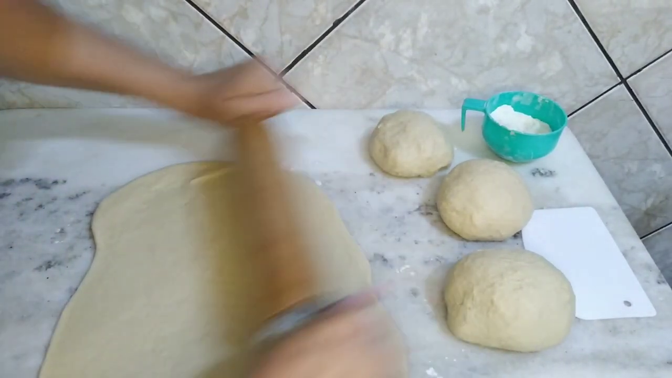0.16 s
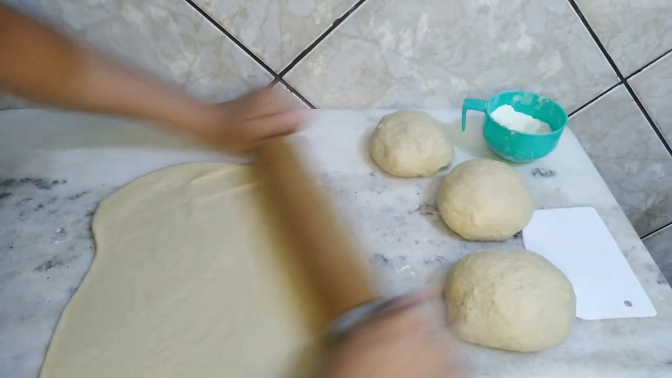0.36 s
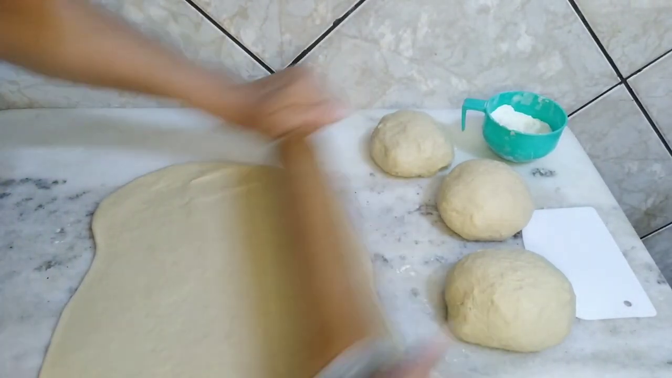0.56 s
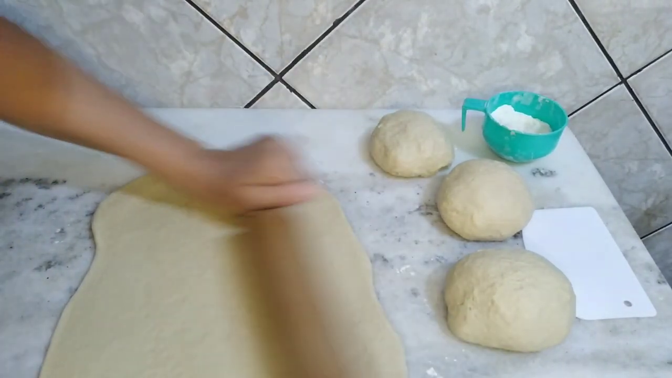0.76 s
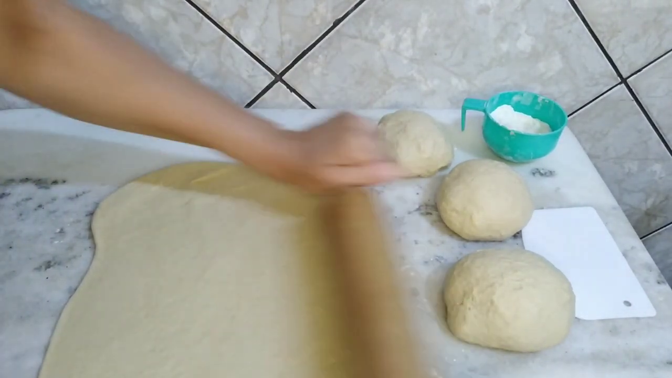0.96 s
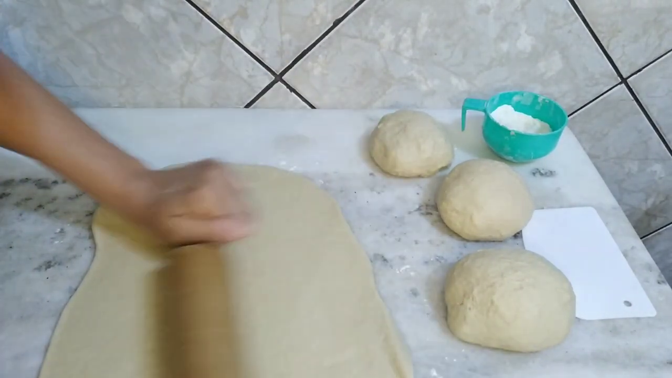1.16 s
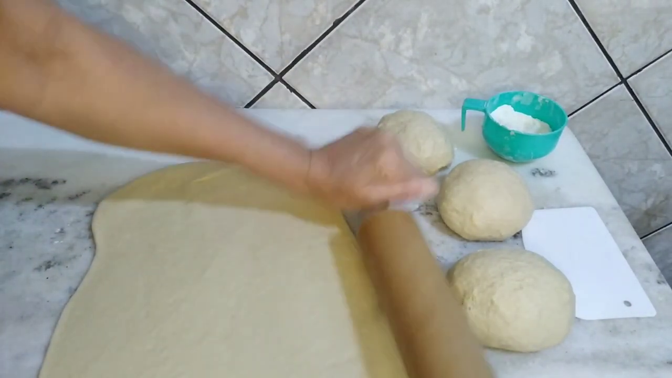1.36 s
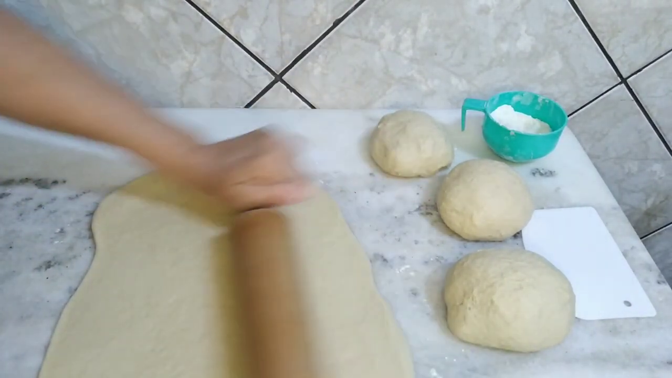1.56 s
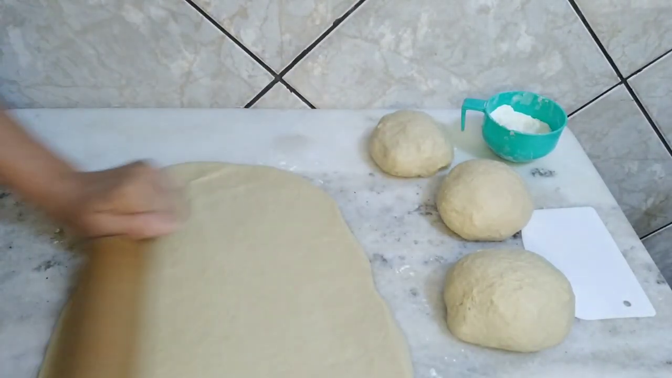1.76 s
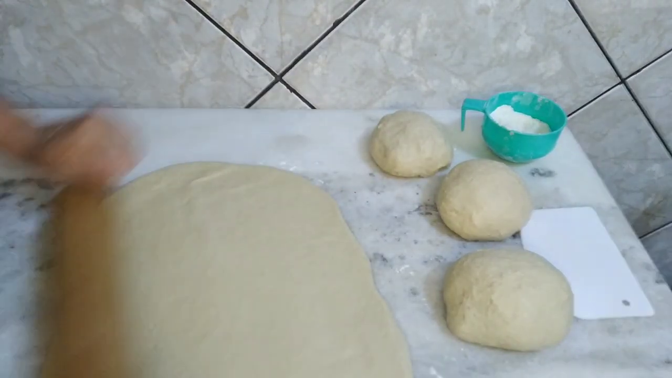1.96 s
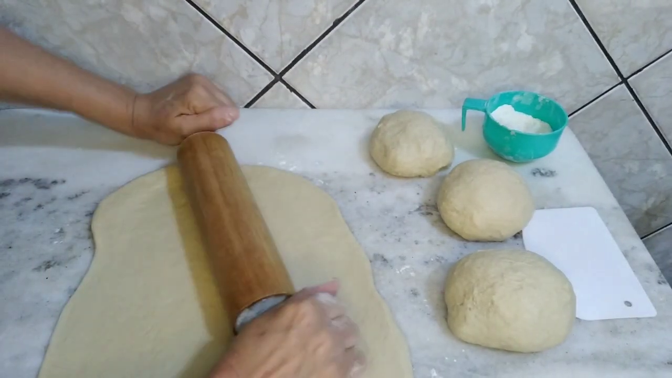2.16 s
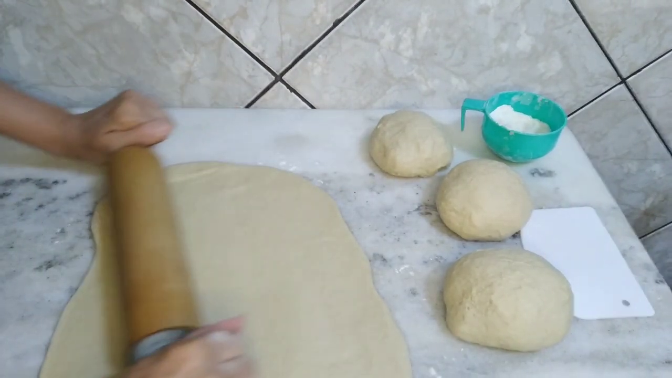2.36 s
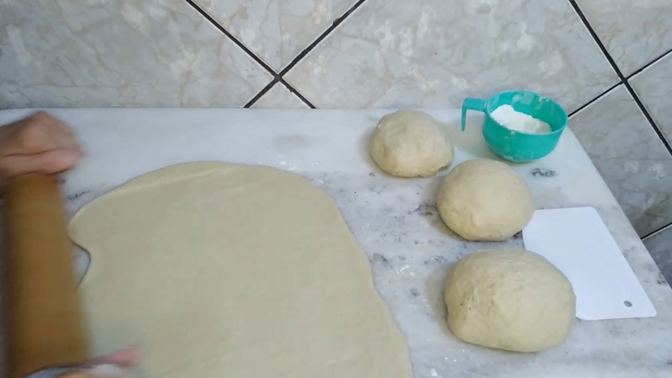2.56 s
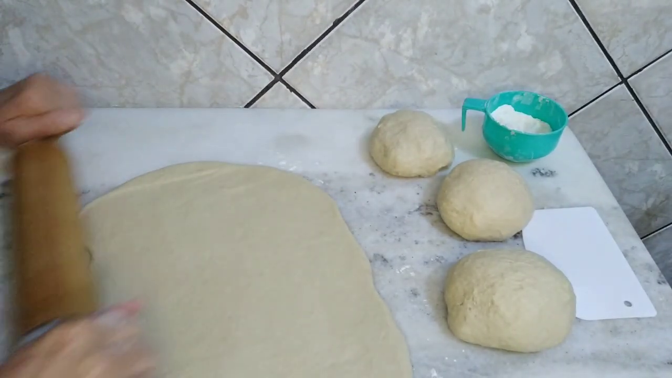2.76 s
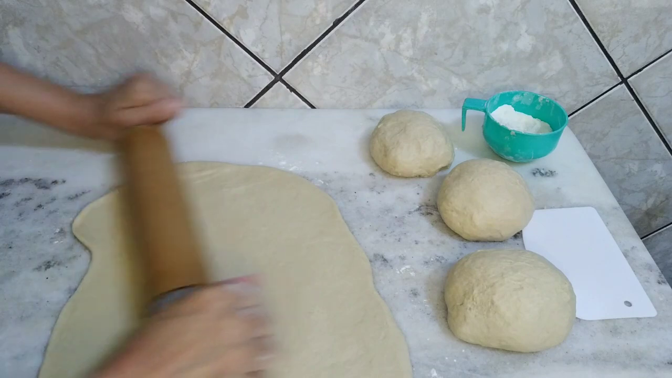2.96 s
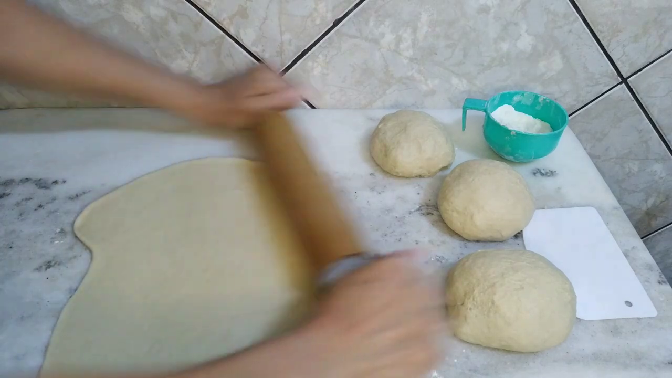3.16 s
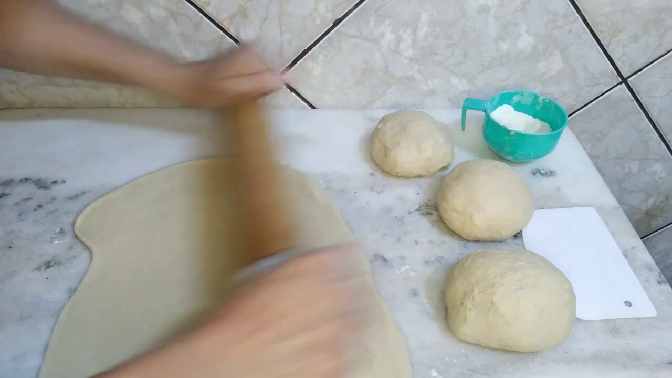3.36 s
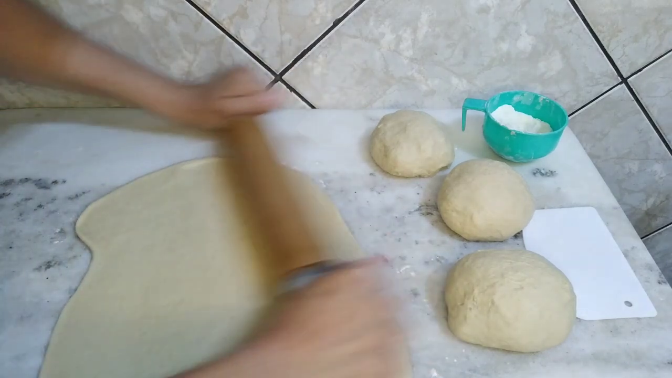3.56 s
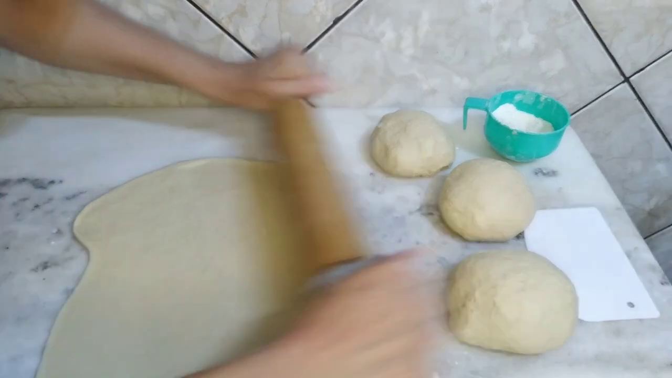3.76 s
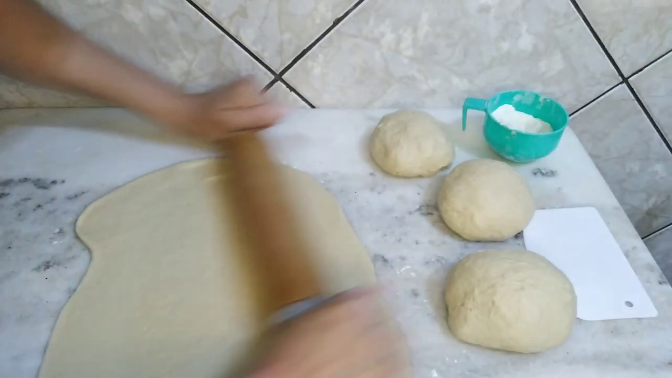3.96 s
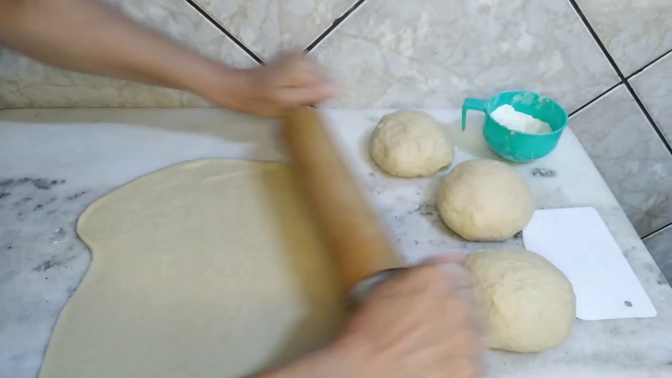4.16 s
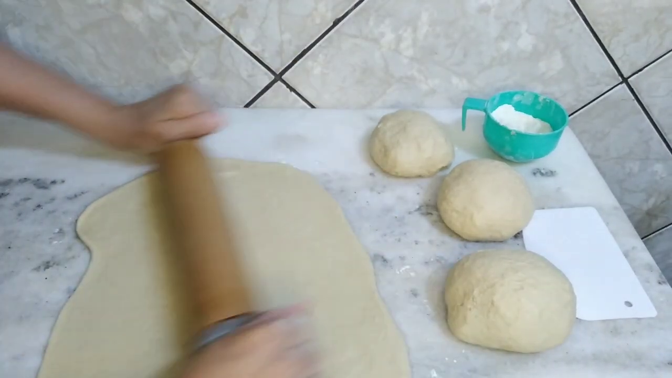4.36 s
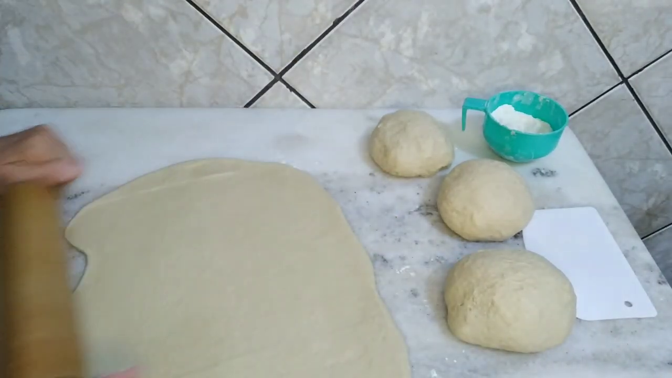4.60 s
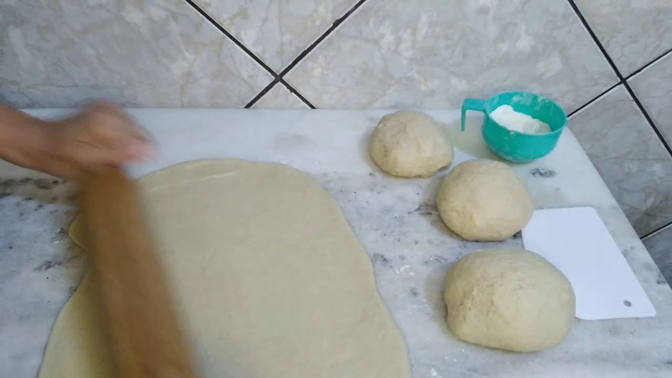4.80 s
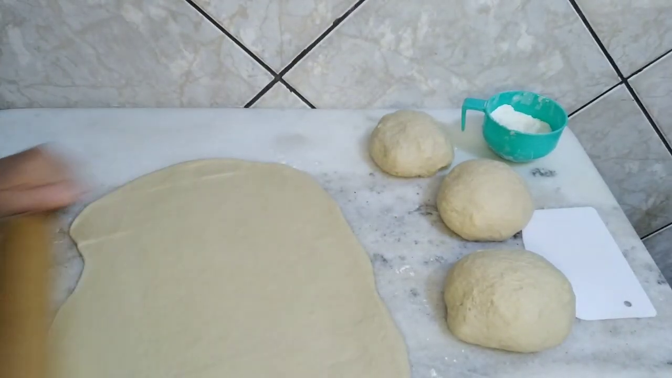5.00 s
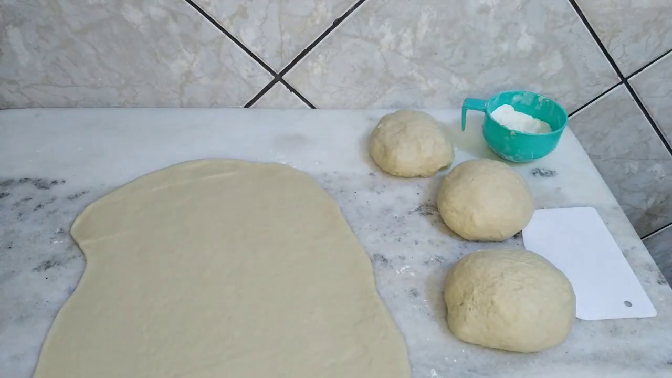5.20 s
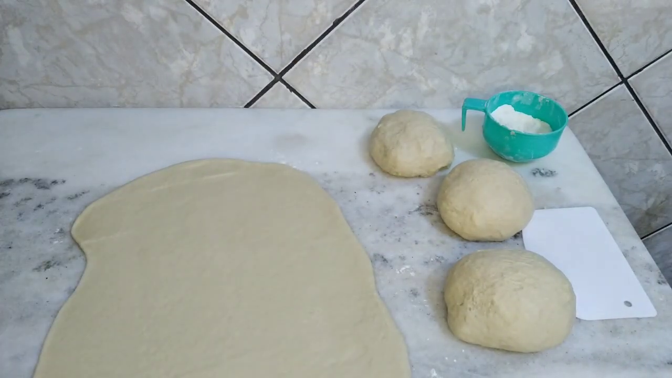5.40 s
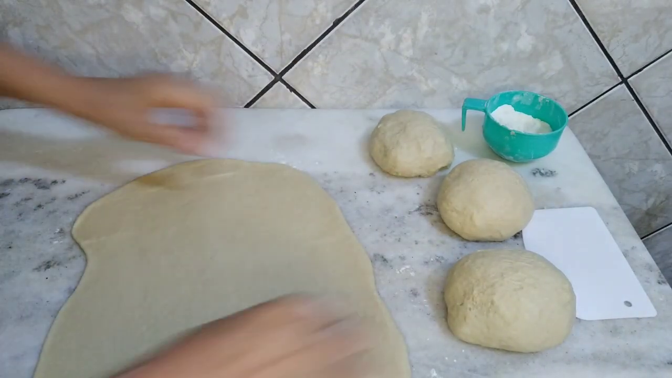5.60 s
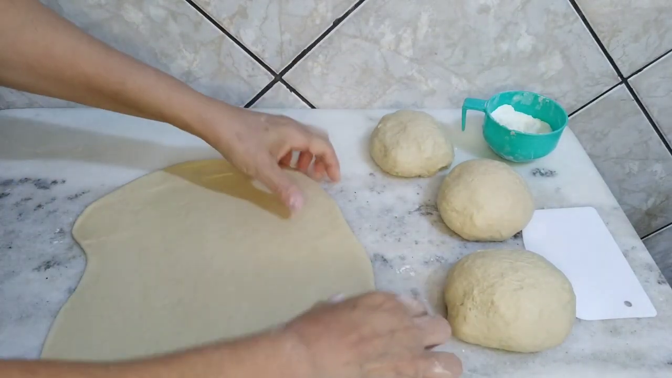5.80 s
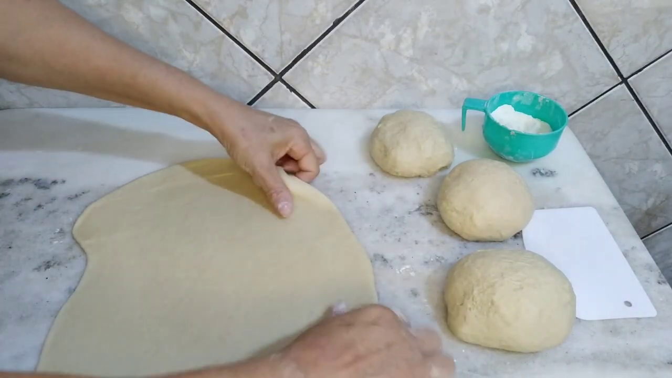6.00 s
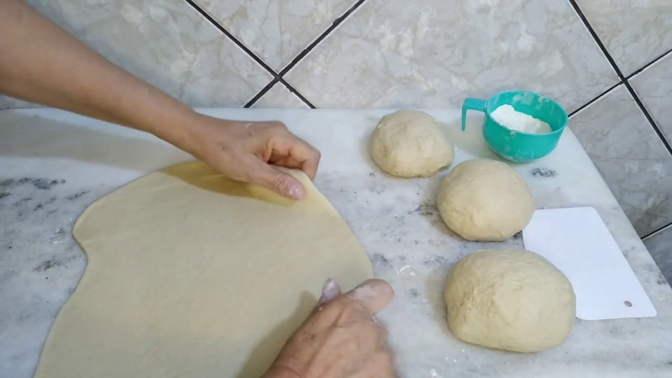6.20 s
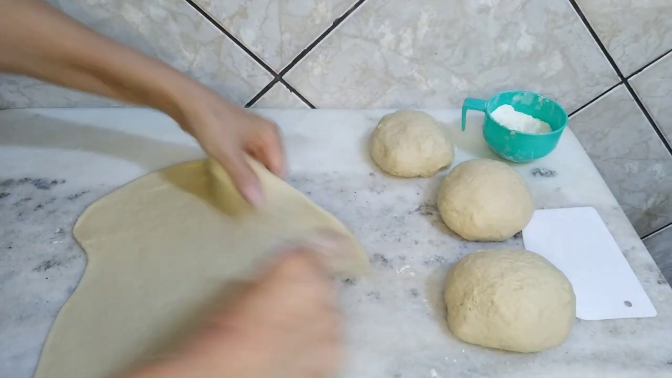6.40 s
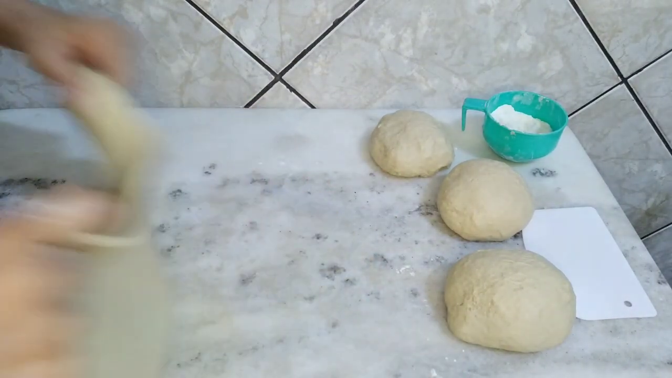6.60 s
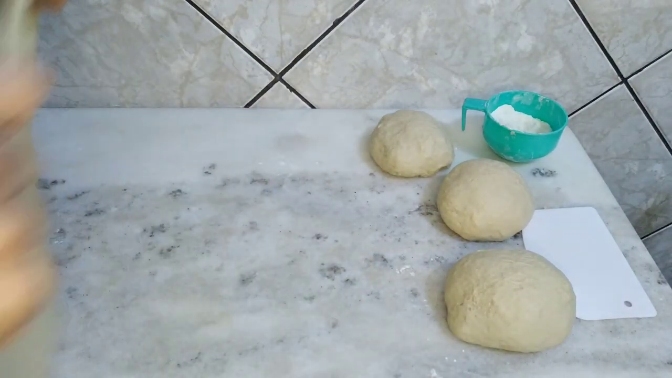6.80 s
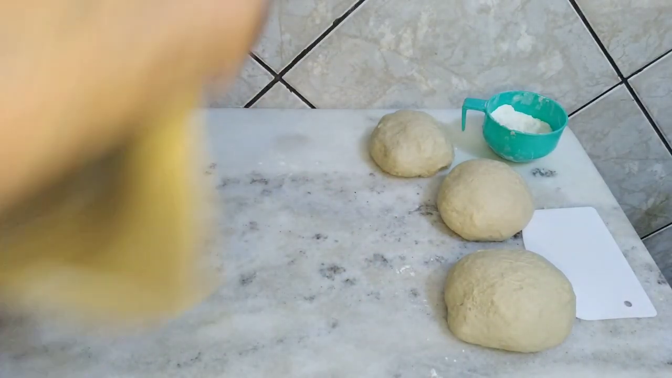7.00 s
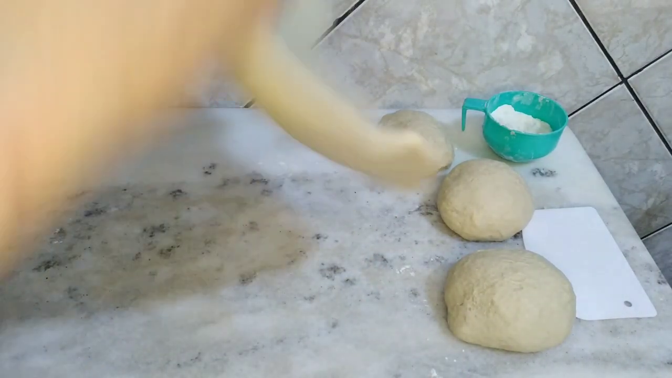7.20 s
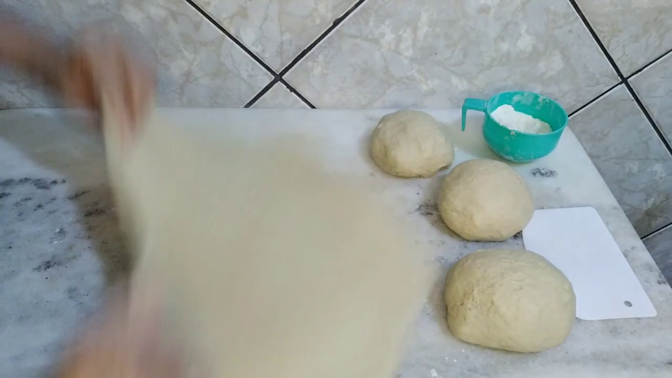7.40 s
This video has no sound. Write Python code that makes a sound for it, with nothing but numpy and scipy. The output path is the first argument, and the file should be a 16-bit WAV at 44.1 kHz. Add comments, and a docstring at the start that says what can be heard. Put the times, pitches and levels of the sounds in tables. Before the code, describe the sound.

A wooden rolling pin works dough on a stone counter in a small tiled kitchen, heard close in stereo. Each stroke brings low rumble, floury rubbing, soft deep thuds and hollow knocks, with faint squeaks. The pin is put aside with a brief clatter around five seconds; hands rustle lightly, the sheet peels away, and a loud wet-sounding slap ends it over a faint motor hum.

```python
"""Rolling pin on a stone counter

A wooden pin goes to and fro over dough in a tiled kitchen; then the sheet is peeled off and slapped down.
Landings ring the slab as damped modes, knocks ring the loose pin and its axle, and floury grit rubs and
hisses as filtered trains of tiny contacts. The pin clatters when put aside, faint squeaks are resonant noise,
a motor hums in wavering sines. Tiled walls add decaying noise echoes; two microphone ports hear it all,
and the level dips briefly at listed moments."""
import sys
import numpy as np
from scipy import signal
from scipy.fft import rfft, irfft, next_fast_len
from scipy.io import wavfile
from scipy.ndimage import uniform_filter1d

SR = 44100
rng = np.random.default_rng(int(sys.argv[2]) if len(sys.argv) > 2 else 0)


def store_pcm(level_fs):
    """Save levels as 16-bit WAV."""
    pcm = np.round(np.clip(level_fs, -1, 1) * 32767).astype(np.int16)
    wavfile.write(sys.argv[1], SR, np.atleast_2d(pcm).T)


def level_to_linear(level):
    """Convert decibel levels to linear amplitude factors, elementwise."""
    exponent = np.asarray(level, float) / 20
    return 10 ** exponent


N = 328545

# Landings of the pin on the dough. Each row: start in seconds, strength in dB, overtone level in dB
# relative to it, t60 of the lowest mode in seconds.
LANDINGS = [(0.232, -9, -14, 0.048), (0.253, -9.5, -26, 0.11), (0.674, 3.5, -11.5, 0.11),
            (0.756, -13, -35, 0.16), (0.823, -31, -5, 0.25), (1.109, -13, -14, 0.27),
            (1.2, -23.5, -31, 0.69), (1.549, -7.5, -14, 0.057), (1.745, -23, -50, 0.18),
            (2.128, -6, -9.5, 0.16), (2.532, -27, 0, 0.2), (2.892, -22.5, -14, 0.44),
            (2.93, -23.5, -29, 0.8), (3.44, -11.5, -32, 0.4), (3.485, -18.5, -22, 0.11),
            (3.874, -3, -29, 0.12), (4.272, 0.5, -11, 0.075), (4.577, -17.5, -24, 0.09),
            (4.839, 2.5, -17.5, 0.071), (4.95, -22.5, -29, 0.23), (5.805, -25.5, -22, 0.3)]
# Hard knocks of the wood. Each row: start in seconds, strength in dB, centre of the excited modes in Hz,
# their spread in octaves, crack and axle levels in dB relative to the strength.
WOOD_KNOCKS = [(0.013, -21.5, 960, 0.58, -67, -32), (0.185, -25, 1000, 0.16, -21, -37),
               (0.236, -22.5, 970, 1.1, -15.5, -21), (0.443, -33.5, 1140, 0.3, -27, -33),
               (0.483, -26.5, 1000, 0.48, -47, -36), (0.647, -14.5, 920, 0.42, -60, -32),
               (0.674, -18, 600, 1.1, -14.5, -16.5), (0.937, -42.5, 2000, 1, -1, -20),
               (1.117, -16, 1660, 0.12, -17, -10), (1.376, -31.5, 1190, 0.43, -36, -39),
               (1.555, -4.5, 1660, 0.32, -17.5, -15), (1.8604, -14.5, 1240, 0.57, -24, -14),
               (2.126, -22.5, 890, 0.54, -17.5, -22), (2.346, -28, 603, 0.88, -36, -34),
               (2.536, -2, 806, 0.46, -36, -55), (2.579, -17, 507, 0.37, -40, -40),
               (2.826, -17.5, 590, 0.62, -32, -40), (2.881, -26, 1000, 0.6, -18, -28),
               (2.888, -17, 1350, 0.57, -2, -4), (3.217, -22, 750, 0.74, -36, -28),
               (3.441, -22.5, 1400, 0.26, -18.5, -29), (3.603, -22.5, 790, 0.17, -29, -37),
               (3.723, -35, 2070, 0.27, -27, -12), (3.876, -20, 2260, 0.72, -10, -6.5),
               (4.199, -24, 1060, 0.37, -50, -44), (4.278, -14.5, 1850, 0.88, -10, -12),
               (4.5809, -3.5, 735, 0.5, -39, -37), (4.845, -19, 920, 0.6, -11, -13),
               (4.997, -10, 580, 0.33, -31, -31), (5.032, -16, 580, 0.34, -47, -31),
               (5.052, -5, 848, 0.44, -49, -37), (5.207, -25.5, 390, 0.34, -45, -44),
               (5.796, -35.5, 1010, 0.42, -30, -32), (5.928, -40, 990, 0.54, -28, -32),
               (6.06, -40, 1160, .4, -22, -30)]
# Upper modes of the slab, struck freely. Each row: frequency in Hz, level in dB, t60 in seconds.
UPPER_SLAB_MODES = [(161, -14, 0.069), (200, -2, 0.12), (297, 5.5, 0.12), (326, 4.5, 0.066), (383, -2, .1),
                    (500, -16, 0.12)]
# Modes of the wooden pin. Each row: frequency in Hz, relative level in dB, t60 in seconds.
PIN_MODES = [(281, 5.5, 0.1), (511, 9.5, 0.04), (611, 5, 0.049), (704, 8.5, 0.026), (804, 8.5, 0.04),
             (921.5, 8, 0.031), (1010, 8.5, 0.019), (1302, -7, 0.064), (1429, 5, 0.025),
             (1560, 16.5, 0.014), (1810, 16.5, 0.01), (2000, 19, 0.0084), (2334, 12, 0.035),
             (2573, 17.5, 0.0073), (2840, -4.5, 0.021)]
# Left-right correlation of diffuse sound. Each row: frequency in Hz, correlation from -1 to 1.
PORT_LIKENESS = [(60, 0.76), (140, 0.74), (310, 0.97), (710, -0.024), (1610, -0.0053), (3670, -0.022)]


def rms_one(x):
    """Normalisation: scale a signal to unit root-mean-square."""
    return x / np.sqrt(np.mean(x ** 2) + 1e-20)


def at_hz(points, hz):
    """Interpolation: read a curve linearly along a log-frequency axis."""
    known_hz, value = np.array(points)[:, 0], np.array(points)[:, 1]
    return np.interp(np.log(hz), np.log(known_hz), value)


def drift(rate):
    """Low-pass noise: a slow random course of spread 1 with its corner near rate (Hz)."""
    r = np.exp(-40 * np.pi * rate / SR)   # corner near rate Hz, for noise made at one twentieth of the sample rate
    noise = rng.standard_normal(N // 20 + 2002)
    slow = signal.lfilter([1], [1, -2 * r, r * r], noise)[2000:]
    return np.interp(np.arange(N) / 20, np.arange(len(slow)), rms_one(slow))


def ring(clicks, hz, t60):
    """Damped resonance: a unit click sets off a decaying sine of initial height 1."""
    r, w = level_to_linear(-60 / (t60 * SR)), 2 * np.pi * hz / SR
    return signal.lfilter([0, np.sin(w)], [1, -2 * r * np.cos(w), r * r], clicks + 1e-18)


def band(x, low_hz, high_hz):
    """Frequency selection: a Butterworth band-pass."""
    sos = signal.butter(2, [low_hz, min(high_hz, .45 * SR)], "band", fs=SR, output="sos")
    return signal.sosfilt(sos, x)


def noise_burst(clicks, decay_ms):
    """Exponential relaxation: each click starts noise that falls by a factor e in decay_ms."""
    envelope = signal.lfilter([1], [1, -np.exp(-1000 / (decay_ms * SR))], clicks + 1e-18)
    return envelope * rng.standard_normal((2, N))


def grit(per_s, spread_db):
    """Shot noise: two random trains of tiny contacts of uneven size and either sign."""
    born = rng.random((2, N)) < per_s / SR
    size = level_to_linear(spread_db * np.minimum(rng.exponential(1, (2, N)), 4))
    return born * size * rng.choice([-1, 1], (2, N))


def stereo_pair(mid, side, hz):
    """Coherence: mix independent mid and side to the left-right correlation found at hz."""
    alike = np.clip(at_hz(PORT_LIKENESS, hz), -1, 1)
    return np.sqrt(1 + alike) * mid + np.sqrt(1 - alike) * side * [[1], [-1]]


def coloured(source, spectrum, patchy_db):
    """Spectral shaping: third-octave bands, each with its level, flicker and correlation; rms 1."""
    out, edges = 0, 20 * 2 ** np.arange(0, 10, 1 / 3)
    for k, (low, high) in enumerate(zip(edges, edges[1:])):
        hz = np.sqrt(low * high)
        if spectrum[0][0] < high and low < spectrum[-1][0]:
            # each band takes the source at another moment
            mid, side = band(np.roll(source, 997 * k, axis=1), low, high)
            gain = level_to_linear(at_hz(spectrum, hz) + patchy_db * drift(32.0))
            out = out + gain * stereo_pair(mid, side, hz)
    return rms_one(out)


def after(events, level_db, t60):
    """Energy decay: power jumps at each blow and dies away exponentially."""
    clicks = np.zeros(N)
    for s, strength_db, *_ in events:
        clicks[round(s * SR)] = level_to_linear(2 * (strength_db + level_db))
    return signal.lfilter([1], [1, -level_to_linear(-120 / (t60 * SR))], clicks + 1e-18)


def stroke_power(column):
    """Incoherent addition: strokes swell and fade linearly in dB, and their powers add."""
    # Strokes of the pin, last the hands and the peeling sheet. Each row: end of the rise in seconds,
    # start of the fade in seconds, full-speed levels of counter rumble, rub and flour hiss in dB rms.
    strokes = [(0.0, -0.023, -43, -41.5, -55.5), (0.312, 0.357, -33.5, -39, -50),
               (0.805, 0.78, -28, -36.5, -43), (1.047, 1.08, -47, -52, -62),
               (1.255, 1.239, -38.5, -34.5, -44), (1.63, 1.807, -43.5, -49, -52),
               (2.241, 2.653, -36.5, -48, -51), (2.89, 3.202, -37.5, -45, -54),
               (3.536, 3.606, -42, -42, -50), (3.928, 4.046, -37, -42.5, -55),
               (4.418, 4.56, -36.5, -48, -53), (4.986, 5.071, -27.5, -42.5, -50.5),
               (5.402, 5.417, -38.5, -54, -65), (5.762, 5.85, -40.5, -56.5, -69.5),
               (6.05, 6.096, -51, -59, -68), (6.405, 6.676, -57, -50.5, -55)]
    # Swell as the pin gathers speed: rumble, rub and hiss in dB per second.
    speed_up = (122, 107, 145.5)
    # Fade as it slows: rumble, rub and hiss in dB per second.
    slow_down = (64.5, 110, 116)
    t, power = np.arange(N) / SR, 0
    for start, end, *db in strokes:
        rise_db = speed_up[column] * np.maximum(start - t, 0)
        fade_db = slow_down[column] * np.maximum(t - end, 0)
        power = power + level_to_linear(2 * (db[column] - rise_db - fade_db))
    return power


def rolling():
    """Rough-contact excitation: bumps shake the slab, grit rubs and hisses; gives rumble and stereo grit."""
    # Lower slab modes. Each row: frequency in Hz, level in dB, t60 in seconds before it is shortened here.
    counter_modes = [(85, -32, 0.12), (102.2, -2.5, 0.18), (124, -4.5, 0.18)]
    # Relative spectrum of the rub. Each row: frequency in Hz, level in dB per Hz.
    rub_spectrum = [(350, 1), (650, 3.5), (1200, -1.5), (1900, 2), (2800, -7.5), (3500, -8), (4300, -20.5),
                    (5500, -17.5)]
    # Relative spectrum of the flour hiss. Each row: frequency in Hz, level in dB per Hz.
    hiss_spectrum = [(3500, -9), (5000, -10.5), (7000, -13.5), (10000, -2), (16000, -35.5)]
    rumble_power, rub_power, hiss_power = map(stroke_power, range(3))

    bumps = grit(150, 1.2)[0]
    # slab modes ring shorter here
    rumble = sum(level_to_linear(db) * ring(bumps, hz, 0.27 * t60) for hz, db, t60 in counter_modes)
    rumble += level_to_linear(-24.5) * sum(level_to_linear(db) * ring(bumps, hz, .5 * t60) for hz, db, t60 in UPPER_SLAB_MODES)
    # the slab rumbles on after a landing
    rumble_power = rumble_power + after(LANDINGS, level_db=-21, t60=0.51)

    # knocks shake up grit, brighter ones more: 14 dB per octave
    skids = [(s, db + 14 * np.log2(hz / 1000)) for s, db, hz, *_ in WOOD_KNOCKS]
    rub_power = rub_power + after(skids, level_db=-33.5, t60=.6)
    rub = np.sqrt(rub_power) * coloured(grit(2500, 4.5), rub_spectrum, patchy_db=2.5)
    hiss = np.sqrt(hiss_power) * coloured(grit(5000, 4.5), hiss_spectrum, patchy_db=1.8)
    return np.sqrt(rumble_power) * rms_one(rumble), rub + hiss


def room_air():
    """Diffuse background: steady Gaussian noise shaped band by band, at -45 dB rms."""
    # Relative spectrum of the room noise. Each row: frequency in Hz, level in dB per Hz.
    air_spectrum = [(20, 14), (30, 0.5), (55, 1), (90, -5.5), (200, -13.5), (400, -12), (800, -20.5),
                    (2200, -27.5), (4500, -33.5), (6500, -46), (10000, -40), (16000, -38.5)]
    return level_to_linear(-45) * coloured(rng.standard_normal((2, N)), air_spectrum, patchy_db=1.2)


def hum():
    """Line spectrum: motor sines whose level and phase waver a little."""
    # Motor lines. Each row: frequency in Hz, level in dB rms about which it wavers.
    motor_lines = [(59.2, -50), (118.4, -52.5), (172.3, -67), (236.9, -60.5), (355.3, -60), (409.1, -70.5),
                   (468.3, -66.5), (705.2, -67.5), (4646, -70)]
    t, out = np.arange(N) / SR, 0
    for hz, db in motor_lines:
        wander = (0.59 + hz / 600) * drift(1.5)   # radians
        phase = 2 * np.pi * hz * t + wander + rng.uniform(0, 2 * np.pi)
        out = out + np.sqrt(2) * level_to_linear(db + 2.0 * drift(5.2)) * np.sin(phase)
    return out


def kitchen(x, gap_ms=1.27):
    """Statistical reverberation: tiled walls answer with noise dying band by band, alike only in the bass."""
    # Echo bands. Each row: centre in Hz, t60 in seconds, level in dB.
    echo_bands = [(90, 0.53, -27), (258, 0.33, -3), (762, 0.47, -6), (2100, 0.55, -7.5),
                  (4300, 0.13, -14.5), (10000, 0.81, -4.5)]
    t, tail = np.arange(SR // 2) / SR, 0
    for hz, t60, db in echo_bands:
        mid, side = band(rng.standard_normal((2, len(t))), hz / 1.6, hz * 1.6)
        decay = level_to_linear(db - 60 * t / t60) / np.sqrt(t60 * SR / 14)   # makes up for the length of the decay
        tail = tail + stereo_pair(mid, side, hz) * decay
    tail = tail * np.clip(t * 1000 / gap_ms, 0, 1) ** 2   # echoes build up over the gap
    return signal.fftconvolve(x[None], tail, axes=1)[:, :N]


def knocks(crack_ms=5.4):
    """Modal excitation: each knock rings the pin modes near its centre and the axle, under a short crack."""
    # Axle modes. Each row: frequency in Hz, relative level in dB, t60 in seconds.
    axle_modes = [(3404, 6, 0.013), (3640, 2, .03), (3990, -8, 0.022)]
    rows, out, ports = np.array(WOOD_KNOCKS), np.zeros((2, N)), [[0], [1]]
    start_s, strength_db, centre_hz, spread, crack_db, axle_db = rows.T
    chance = rng.normal(0, 1, (len(rows), len(PIN_MODES) + 1))
    # the pin's place shifts the arrival at the second port, by chance about 2 samples
    at = (start_s * SR + np.outer([0, 2], chance[:, -1])).astype(int)
    widen = 2 ** 0.42   # a yielding contact lets each mode swell in, without a bare click

    def struck_mode(height, hz, t60):
        """Mode response: clicks of the given heights ring one band-limited resonance."""
        clicks = np.zeros((2, N))
        clicks[ports, at] = height
        return band(ring(clicks, hz, t60), hz / widen, hz * widen)

    for k, (hz, level_db, t60) in enumerate(PIN_MODES):
        off = np.log2(hz / centre_hz) / np.maximum(spread, .15)
        off = np.where(off > 0, 1.3, .8) * off   # blunt contact: the colour falls faster above the centre
        mode_db = strength_db + level_db - 14.0 - 2.13 * off ** 2 + 2 * chance[:, k]
        out += struck_mode(-level_to_linear(mode_db), hz, t60)
    for hz, level_db, t60 in axle_modes:
        out += struck_mode(level_to_linear(strength_db + axle_db + level_db), hz, t60)
    # wood on wood is a blunt contact
    out = signal.sosfilt(signal.butter(4, 4300.0, fs=SR, output="sos"), out)

    clicks = np.zeros((2, N))
    clicks[ports, at] = level_to_linear(strength_db + crack_db - 2.0)
    return out + band(noise_burst(clicks, crack_ms), 2500, 9000)


def thuds(slab_hz=92.2, rise_ms=4.27, glide=0.65, settle_ms=6.7):
    """Stiffness and pitch: a soft push rings the slab; squeezed dough is stiffer, so pitch starts high."""
    out, t = np.zeros(N + SR), np.arange(SR) / SR
    push = np.hanning(int(rise_ms * SR / 1000))
    for s, strength_db, over_db, t60 in LANDINGS:
        pitch_hz = slab_hz * (1 + glide * np.exp(-t * 1000 / settle_ms))
        wave = level_to_linear(-60 * t / max(t60, .03)) * np.sin(2 * np.pi * np.cumsum(pitch_hz) / SR)
        for hz, db, ring_s in UPPER_SLAB_MODES:
            wave += level_to_linear(db + over_db - 60 * t / ring_s) * np.sin(2 * np.pi * hz * t)
        at = round(s * SR)
        out[at:at + SR] -= level_to_linear(strength_db) * np.convolve(wave, push / push.sum())[:SR]
    return out[:N]


def squeaks(t60=.015):
    """Friction-driven resonance: broken noise in one narrow mode swells and fades."""
    # Faint axle squeaks. Each row: start and length in seconds, frequency in Hz,
    # level in dB rms before swell and flicker.
    axle_squeaks = [(0.705, 0.15, 3460, -45), (1.176, 0.14, 3390, -40.5), (2.568, 0.27, 2460, -53),
                    (3.5, 0.18, 2110, -50), (4.571, 0.099, 3420, -52), (4.94, 0.34, 3420, -53),
                    (5.353, 0.24, 2440, -63)]
    out = np.zeros(N)
    for s, length, hz, db in axle_squeaks:
        size, at = round(length * SR), round(s * SR)
        tone = rms_one(ring(rng.standard_normal(SR // 2), hz, t60)[:size])
        out[at:at + size] += level_to_linear(db) * np.hanning(size) ** .5 * tone
    return out * level_to_linear(3 * drift(25))


def clatter(db=-29, per_s=160.0, centre_hz=426.0):
    """Repeated impact: the pin rocks on bare stone, dense uneven touches ringing its lower modes."""
    # The pin is put aside: start, loudest moment and end, all in seconds.
    start, loudest, end = (4.995, 5.07, 5.25)
    moments = [start - .004, start, loudest, end, end + .06]
    swell_db = np.interp(np.arange(N) / SR, moments, [-60, -7, 0, -15, -60])
    touches, modes = grit(per_s, spread_db=2)[0], 0
    for hz, level_db, t60 in PIN_MODES:
        weight_db = level_db - 27.0 * np.log2(hz / centre_hz) ** 2
        modes = modes + level_to_linear(weight_db) * ring(touches, hz, t60)
    return level_to_linear(db + swell_db) * rms_one(modes)


def slaps(splash_ms=11.0):
    """Cavity resonance: trapped air pops out from under the sheet in a splash of noise."""
    # Dough sheet on stone. Each row: start in seconds, strength in dB, air pocket frequency in Hz,
    # splash level in dB, relative to the strength and to a reference of 19 dB.
    sheet_slaps = [(7.425, 0, 783, -28), (7.4428, 0.5, 610, -24.5), (7.4445, 4.5, 1540, -42)]
    out = np.zeros((2, N))
    for s, strength_db, hz, splash_db in sheet_slaps:
        click = np.zeros(N)
        click[round(s * SR)] = -level_to_linear(strength_db)
        splash = band(noise_burst(click, splash_ms), 240, 2380)
        out += ring(click, hz, 7.8 / hz) + level_to_linear(splash_db + 19) * splash   # pocket: t60 of 7.8 periods
    return out


def scene():
    """Superposition: pin, counter, dough, room and motor add up."""
    rumble, rubbing = rolling()
    no_deep_bass = signal.butter(6, 70, "high", fs=SR, output="sos")   # the microphone passes little below 70 Hz
    slab = signal.sosfilt(no_deep_bass, thuds() + rumble)
    # thuds, rumble, knocks, clatter, slaps and squeaks feed the echoes
    echoing = slab + knocks() + clatter() + slaps() + squeaks()
    return echoing + kitchen(echoing.mean(axis=0)) + rubbing + room_air() + hum()


def top_cut(x):
    """Nothing passes above the cut-off."""
    return signal.sosfilt(signal.butter(12, 15900, fs=SR, output="sos"), x)


def record(dry):
    """Linear filtering, then saturation: ports differ in colour and delay, level dips, peaks are rounded."""
    # Colour of both ports. Each row: frequency in Hz, gain in dB.
    port_colour = [(6500, 1), (7600, 2), (8400, 2.5), (9300, -3), (11000, -10.5), (16000, -13)]
    # Left-right difference of the ports. Each row: frequency in Hz, left minus right in dB.
    port_difference = [(500, -0.18), (1400, 0.72), (3000, -0.99), (9000, 1.1), (14000, -1.5)]
    # Brief dips in level. Each row: start in seconds, length in milliseconds.
    dips = [(0.1208, 6.2), (1.465, 10.3), (5.6206, 8.1), (6.3181, 6.5), (6.8108, 7.8), (6.828, 24.8),
            (6.8838, 6.7), (6.8973, 23), (7.146, 8.7), (7.162, 5.2), (7.193, 13), (7.2261, 5.5)]
    size = next_fast_len(N)
    hz = np.fft.rfftfreq(size, 1 / SR) + 1   # 1 Hz up keeps the logarithm finite
    late = np.exp(-2j * np.pi * hz * np.array([[9e-5], [0]]))   # left hears 90 microseconds late
    colour = level_to_linear(at_hz(port_colour, hz) + at_hz(port_difference, hz) * [[.5], [-.5]])
    heard = irfft(rfft(dry, size) * late * colour, size)[:, :N]

    shut = np.zeros(N)
    for s, ms in dips:
        shut[round(s * SR):round((s + ms / 1000) * SR)] = 1
    gain = level_to_linear(-32 * uniform_filter1d(shut, size=30))   # dips of 32 dB with short slopes
    top = 1.6   # ceiling of the soft saturation
    return top_cut(top * np.tanh(heard * gain / top))


dry = scene()
out = record(dry)
store_pcm(out)
```